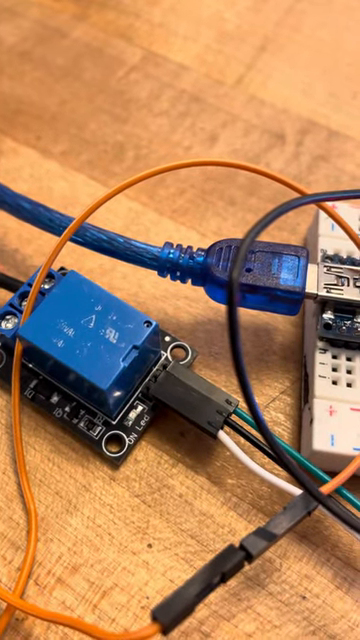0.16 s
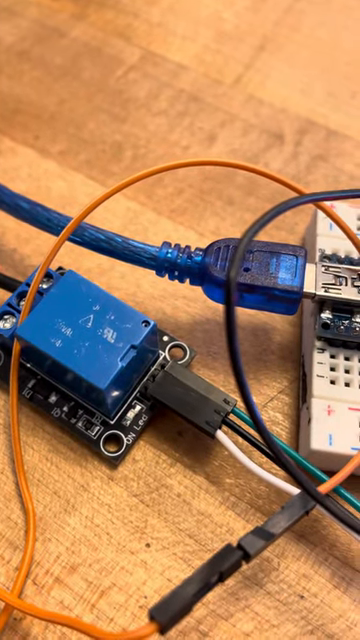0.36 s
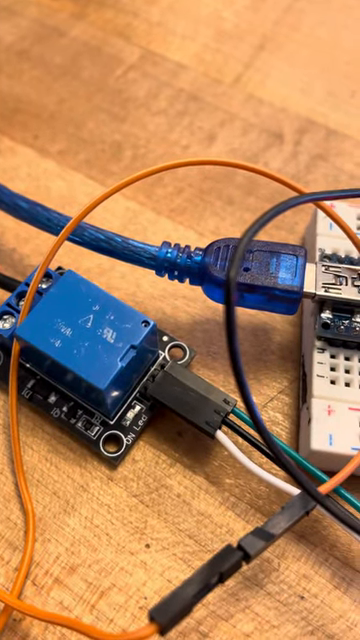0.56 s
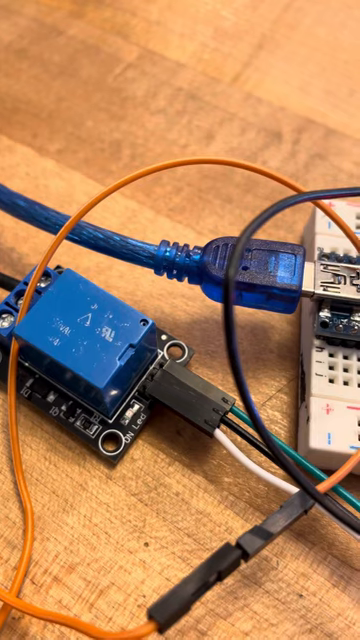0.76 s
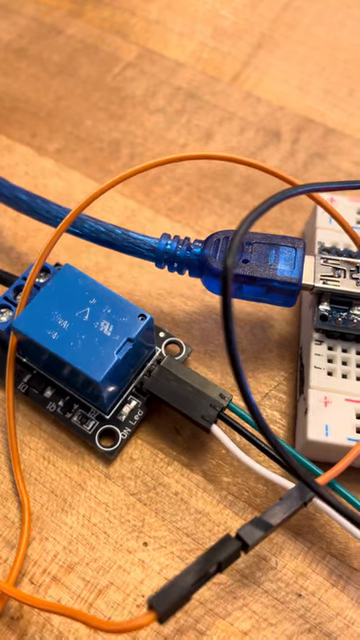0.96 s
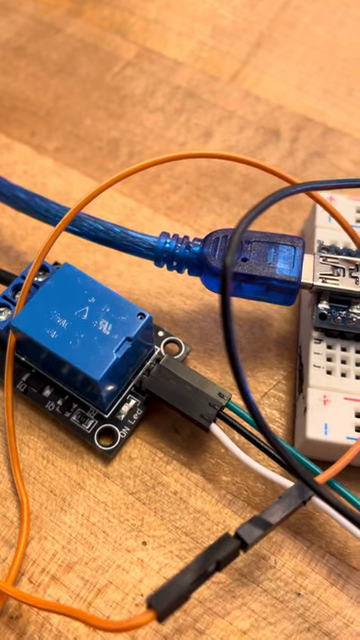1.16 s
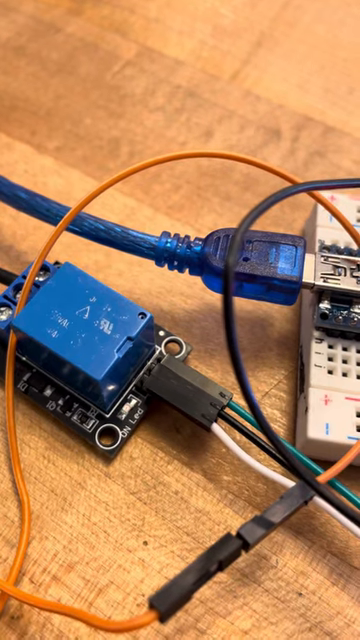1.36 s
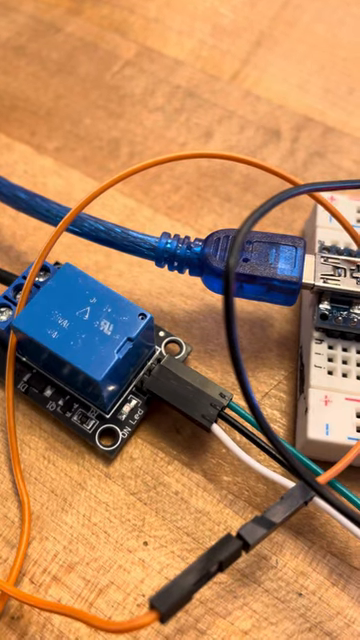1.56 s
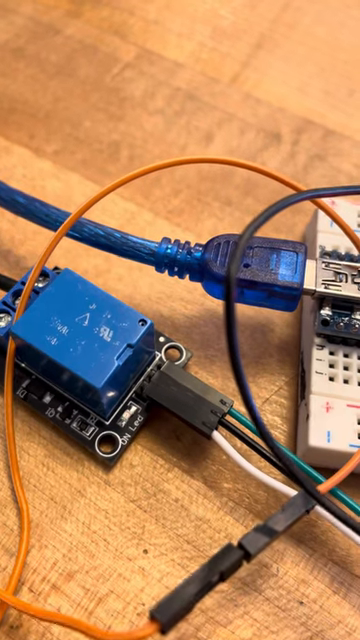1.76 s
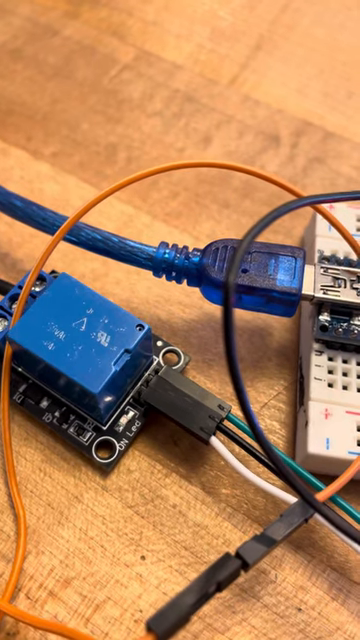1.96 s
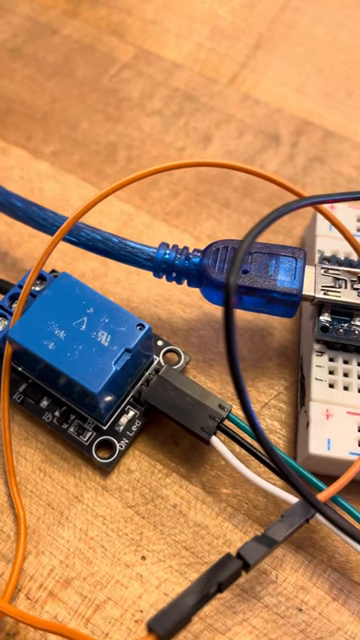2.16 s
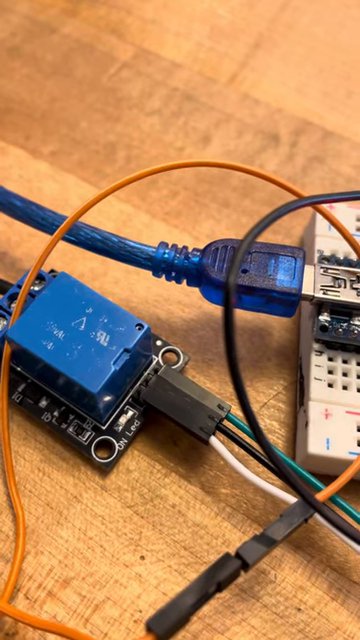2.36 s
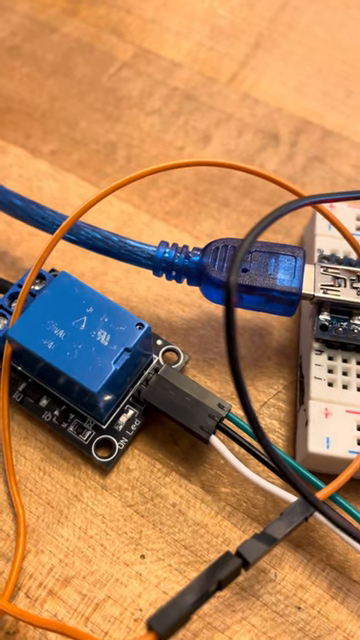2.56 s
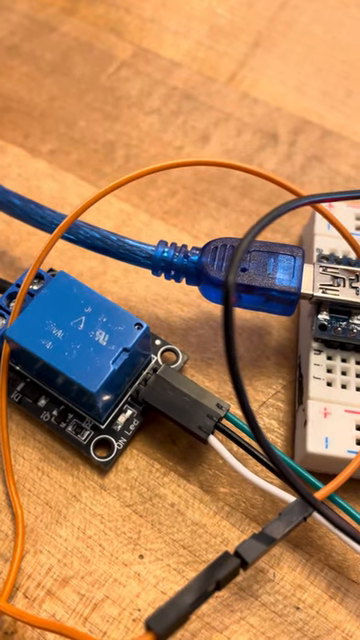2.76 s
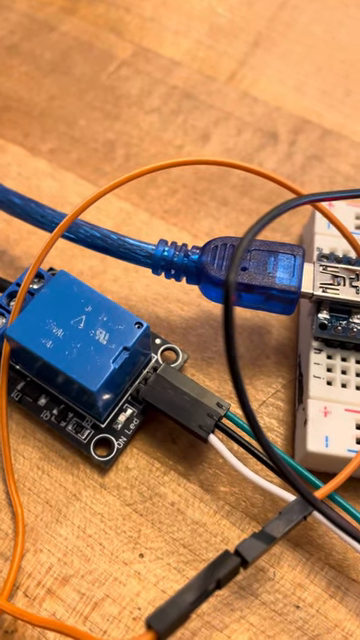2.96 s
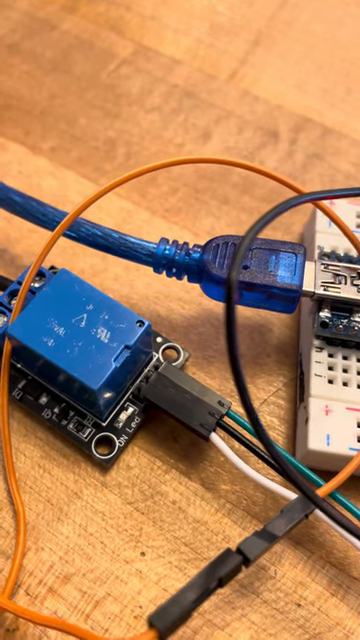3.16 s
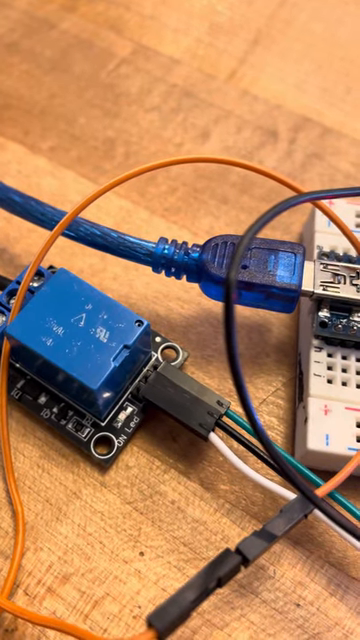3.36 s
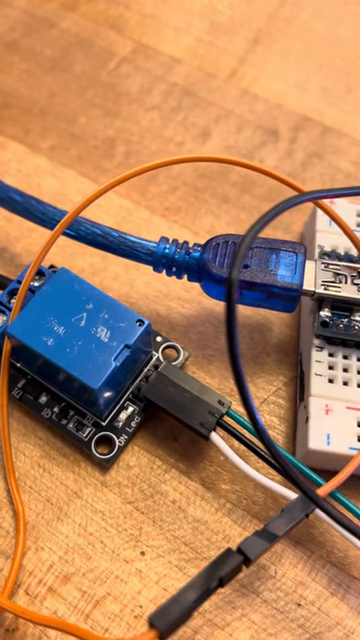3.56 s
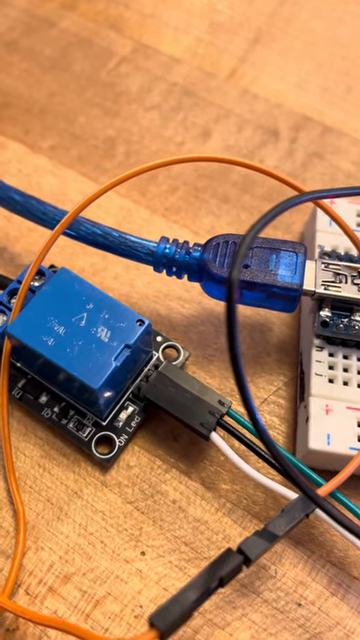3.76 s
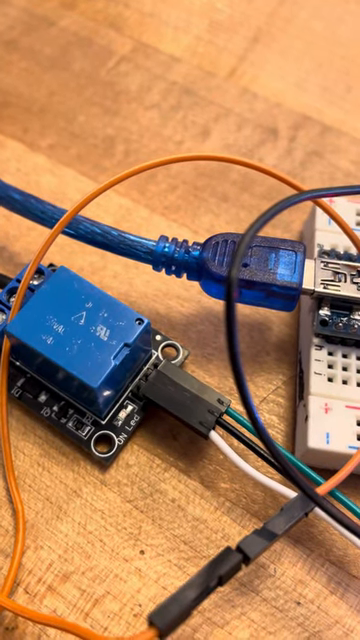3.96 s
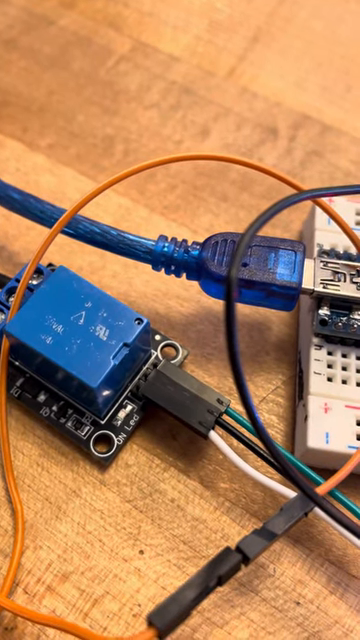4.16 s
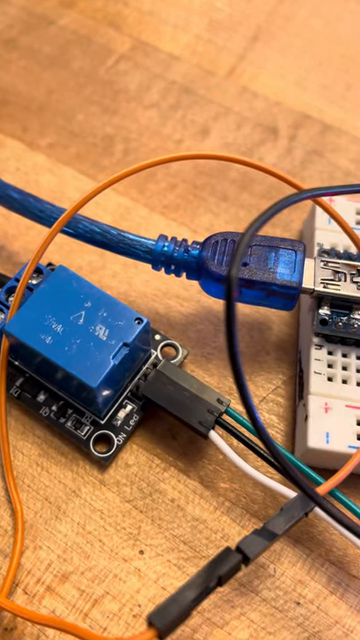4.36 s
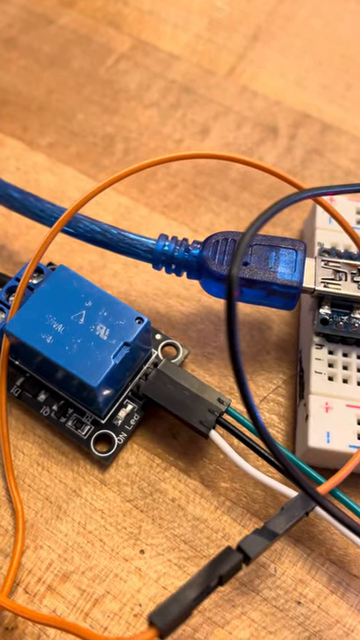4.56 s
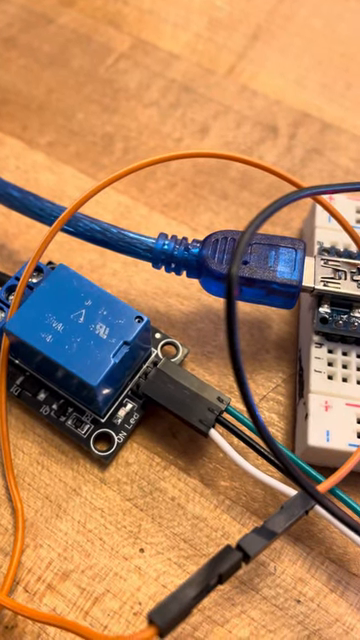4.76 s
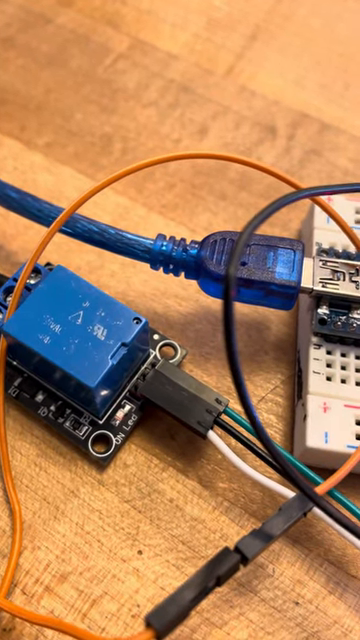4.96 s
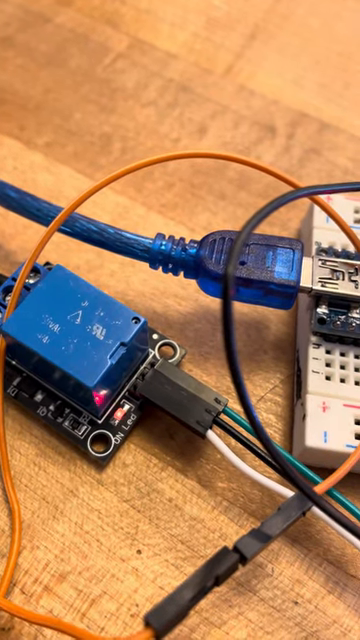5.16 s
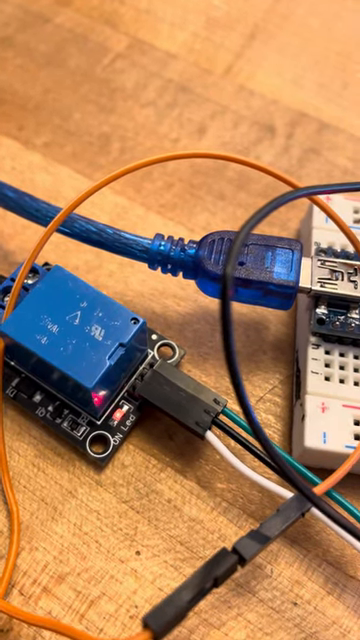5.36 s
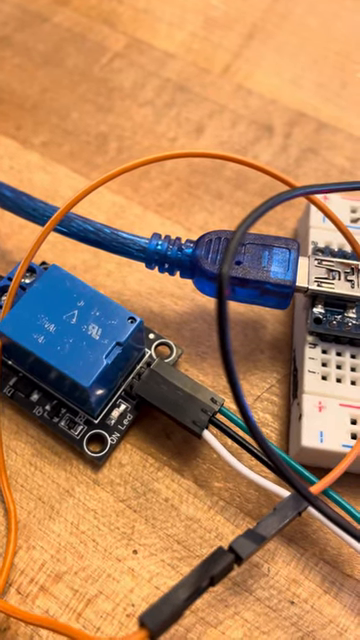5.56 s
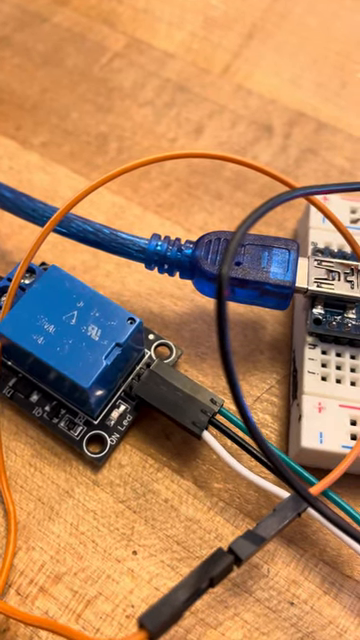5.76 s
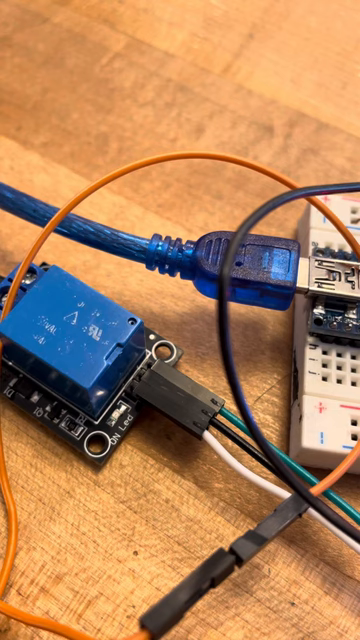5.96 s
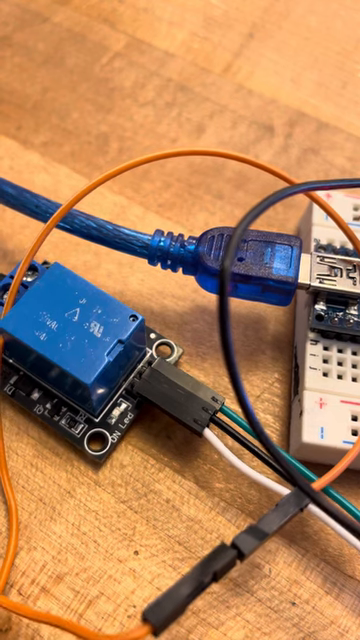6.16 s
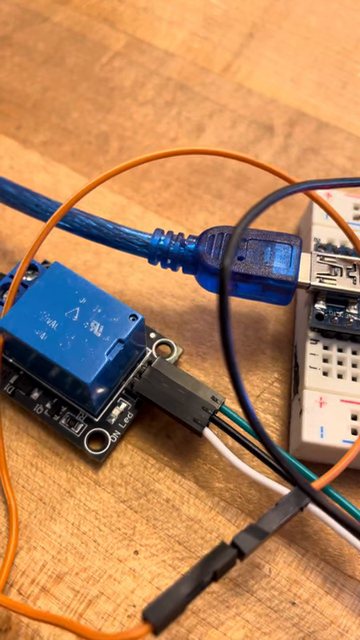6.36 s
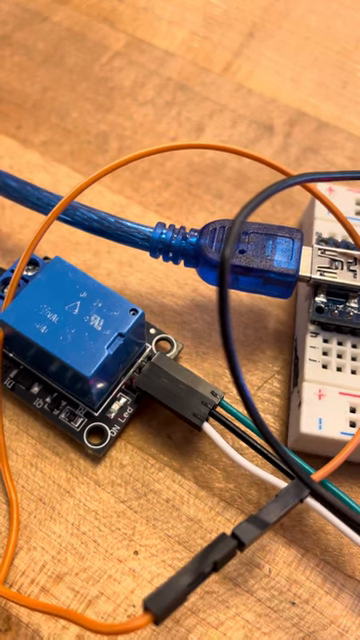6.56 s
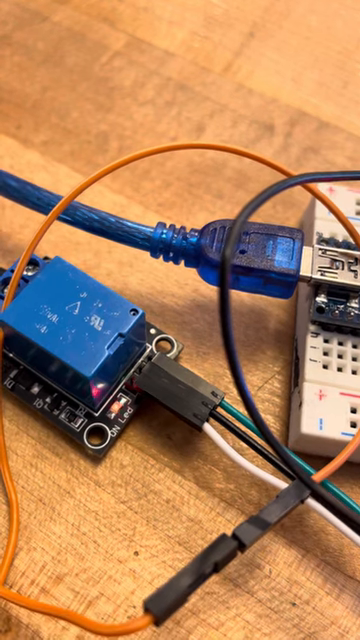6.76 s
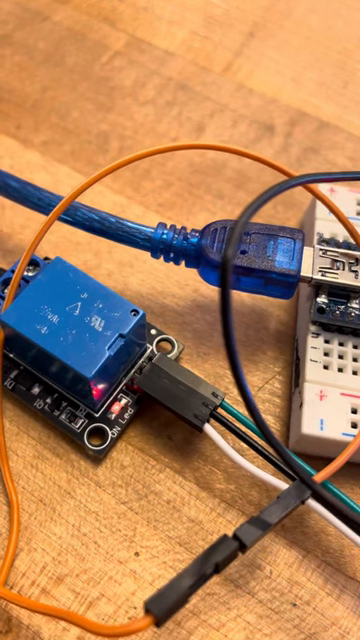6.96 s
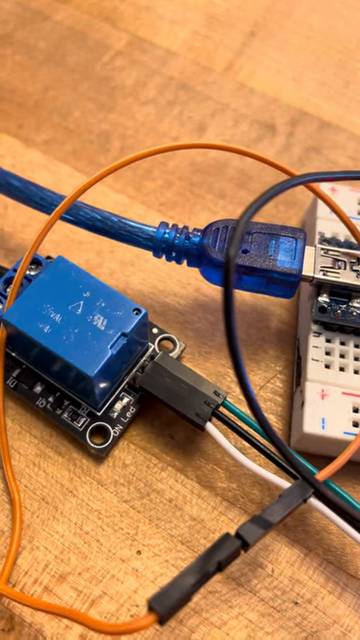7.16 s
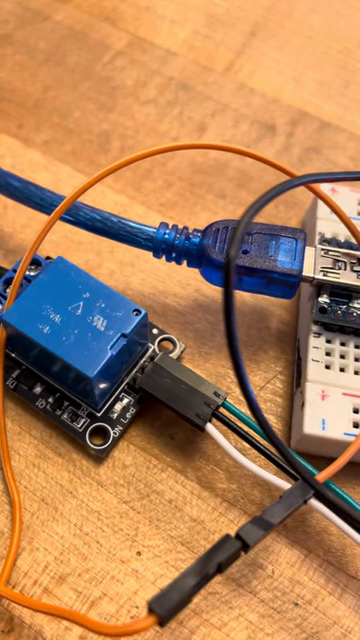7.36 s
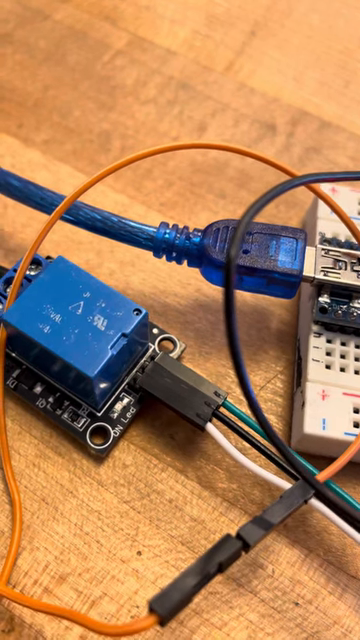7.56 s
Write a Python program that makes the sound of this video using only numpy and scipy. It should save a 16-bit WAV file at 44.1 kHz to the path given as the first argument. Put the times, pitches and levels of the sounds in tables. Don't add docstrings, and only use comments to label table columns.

```python
import sys
import numpy as np
from scipy import signal
from scipy.fft import rfft, irfft, next_fast_len
from scipy.io import wavfile

SR = 44100
rng = np.random.default_rng(int(sys.argv[2]) if len(sys.argv) > 2 else 0)


def makeup_ratio(level_db):
    decades = np.asarray(level_db, float) / 20
    return 10 ** decades


def master_out(mix):
    frames = np.transpose(np.atleast_2d(mix))
    ceiling = np.clip(frames, -1, 1)
    pcm = np.round(ceiling * 32767).astype(np.int16)
    wavfile.write(sys.argv[1], SR, pcm)


N = 335601
SPAN = 16384
CASE_LAG_S = -0.00011


def shape(x, table):
    hz, db = np.transpose(table)
    f = np.maximum(np.arange(x.shape[-1] // 2 + 1) * SR / x.shape[-1], 1)
    return irfft(rfft(x) * makeup_ratio(np.interp(np.log(f), np.log(hz), db)), x.shape[-1])


def resonate(x, hz, width_hz):
    return signal.lfilter(*signal.iirpeak(hz, hz / width_hz, fs=SR), x)


def lowpass(x, order, top_hz):
    return signal.sosfilt(signal.butter(order, top_hz, fs=SR, output="sos"), x)


def dull(x):
    return lowpass(x, 20, 12900)


def unit(x):
    return x / np.sqrt(np.mean(x ** 2))


def fade(t, t60_s):
    return np.exp(-np.log(1000) * t / t60_s)


def onset(length_s):
    return np.exp(-np.arange(SPAN) / SR / length_s)


def add(track, s, x):
    i = int(s * SR)
    track[:, i:i + x.shape[1]] += x[:, :N - i]


def turns(hz, ports=None):
    # pitch_hz, lag_turns
    side_turns = [(0, 0), (2400, 0), (3500, .93), (5300, 1.04), (6900, 1.42), (8300, 1.6), (11000, 2.0),
                  (14000, 2.4), (16500, 2.7), (22050, 4.0)]
    return np.interp(hz, *np.transpose(side_turns if ports is None else ports))


def late(x):
    f = np.arange(len(x) // 2 + 1) * SR / len(x)
    right = irfft(rfft(x) * np.exp(-2j * np.pi * turns(f)), len(x))
    return np.array([x, right])


def ring(modes, s, contact_s=.0001, ports=None, swell_s=0, span=SPAN):
    out = 0
    luck = rng.standard_normal((len(modes), 2))
    for k, (hz, db, t60_s, *lean_db) in enumerate(modes):
        lag_s = ports if np.isscalar(ports) else turns(hz, ports) / hz
        delay_s = s % (1 / SR) + np.maximum([[-lag_s], [lag_s]], 0)
        t = np.maximum(np.arange(span) / SR - delay_s, 0)
        luck_db, detune = 1.5 * luck[k, 0], 1 + .006 * luck[k, 1]
        gain = (-1) ** k * makeup_ratio(db + luck_db + sum(lean_db) * np.array([[.5], [-.5]]))
        rise_s = contact_s + swell_s * (500 / hz) ** 3
        rise = 1 - np.exp(-t / rise_s)
        out = out + gain * fade(t, t60_s) * np.sin(2 * np.pi * hz * detune * t) * rise
    return out


def air():
    # pitch_hz, level_db_per_hz
    rumble = [(20, -16), (40, -20), (70, -1.5), (100, -2.5), (260, -9), (300, -14.5), (620, -23),
              (900, -35.5), (1440, -42.5), (1900, -51.5), (2600, -55.5), (4000, -60.5), (6000, -69),
              (9000, -71.5), (12400, -77), (13300, -92)]
    # pitch_hz, width_hz, level_db
    hum = [(57, 23, -61), (85.9, 3.9, -52.5), (114.2, 28, -56.5), (137.43, 9, -55), (186.14, 11.16, -55.5),
           (224.8, 10, -65.5), (257.6, 6.8, -58.5), (642.6, 12.6, -77), (704, 25, -92), (849.4, 18.7, -82),
           (1000, 190, -93.5), (1222, 170, -87.5), (2142, 160, -93.5)]
    # pitch_hz, level_db
    port_width = [(60, -37.5), (110, -40), (200, -24.5), (380, -9.5), (700, -2.5), (1290, -0.5),
                  (2380, -3.5), (4400, 3.5), (8120, 5.5), (15000, -8)]
    # pitch_hz, level_db_per_hz
    hiss_colour = [(1500, -18.5), (3000, -2.5), (5400, -1), (7000, -4), (8400, -7.5), (9700, -4.5),
                   (12400, -9.5), (13000, -30.5), (14500, -46)]
    rumble_db, hiss_db = -50.5, -91.5
    warm = 8192
    both = []
    for noise in rng.standard_normal((2, next_fast_len(N + warm))):
        broad = makeup_ratio(rumble_db) * unit(shape(rng.standard_normal(len(noise)), rumble))
        for hz, width_hz, db in hum:
            mode = resonate(resonate(noise, hz, width_hz), hz, 2 * width_hz)
            broad = broad + makeup_ratio(db) * unit(mode)
        both.append(broad)
    mid, side = both[0], shape(both[1], port_width)
    hiss = makeup_ratio(hiss_db) * unit(shape(rng.standard_normal(len(mid)), hiss_colour))
    return (np.array([mid + side, mid - side]) + late(hiss))[:, warm:warm + N]


def room(send):
    # pitch_hz, level_db
    walls = [(300, -5), (1500, 1.5), (3200, -6), (4700, -6), (6200, -2), (7600, -9.5), (9800, -1),
             (11300, -10), (12400, -2.5), (13800, -4)]
    room_t60_s, treble_t60_s, fill_s = .38, .24, .012
    spread = .25
    clump_db, clumps_per_s, clump_s = 4, 160, .05
    t = np.arange(SPAN) / SR
    common, *own = rng.standard_normal((3, SPAN))
    spread_colour = [(1500, 1.5), (3000, 17.5), (5500, 1.0), (6800, 0), (7600, -11.5), (8500, 0)]
    dense = late(common) + spread * shape(np.array(own), spread_colour)
    low = shape(dense, [(4000, -12.0), (8000, -33.5)])
    tail = low * fade(t, room_t60_s) + (dense - low) * fade(t, treble_t60_s)
    clumps = np.interp(t, np.arange(64) / clumps_per_s, rng.standard_normal(64))
    tail = dull(tail * makeup_ratio(clump_db * clumps * np.exp(-t / clump_s)))
    tail = shape(tail * (1 - np.exp(-t / fill_s)), walls)
    return signal.fftconvolve(send[:1], tail, axes=1)[:, :N]


def ticks(near, send):
    # start_s, level_db, pitch_hz, length_s
    taps = [(2.1235, -58, 8800, 0.0017), (2.1235, -84, 12300, .003), (2.1235, -68.5, 4600, .004),
            (2.3252, -62, 11800, .002), (2.3252, -70, 8960, .002), (2.3252, -71, 6000, .002),
            (2.333, -78, 11500, .0014), (2.333, -71, 7000, .0014), (2.279, -76.5, 4700, 0.018),
            (2.281, -83.5, 11500, .018), (4.363, -72, 2200, .006), (2.1064, -72.5, 4440, 0.0048),
            (2.117, -75.5, 4700, 0.0045), (2.194, -75.5, 4240, .0013), (3.262, -88, 9930, 0.0021),
            (5.4357, -59.5, 10700, 0.00054), (5.713, -73.5, 6500, 0.03), (5.714, -71.5, 11500, 0.00605),
            (5.83, -90, 10940, 0.0018), (5.887, -80, 10040, 0.0011), (7.062, -81, 4800, 0.004),
            (7.167, -74, 5900, 0.014), (7.167, -81, 11200, .014), (7.179, -76, 5400, .004)]
    # start_s, level_db, pitch_hz, length_s
    rustles = [
        (.86, -87, 7000, 0.0022),
        (2.112, -83, 7000, 0.0091),
        (2.321, -83, 5000, .002),
        (4.362, -73, 6660, 0.00426),
        (6.848, -82, 3120, 0.0027),
        (7.1785, -76, 8030, 0.003),
    ]
    usual_db, quiet_db, room_fall_per_db = -73, -8, 1.5
    t = np.arange(SPAN // 4) / SR
    # rows, width over pitch, room_db
    for rows, width, room_db in ((taps, .42, -40), (rustles, 1.2, -38.5)):
        for s, db, hz, length_s in rows:
            swell = (t / length_s) * np.exp(1 - 3 * t / length_s) * 3
            burst = lowpass(rng.standard_normal(len(t)) * swell, 4, 13500)
            scrape = resonate(resonate(burst, hz, width * hz), hz, 1.7 * width * hz)
            tick = makeup_ratio(db + 15.0) * late(scrape)
            add(near, s, tick)
            wet_db = room_db - room_fall_per_db * max(db - usual_db, quiet_db)
            add(send, s, makeup_ratio(wet_db) * tick)


def keys(near, send):
    # start_s, knock_db, thump_db, clip_db
    hits = [
        (1.7696, -48.5, -51, -75),
        (1.7796, -59, -47.5, -48),
    ]
    # mode_hz, level_db, t60_s, left_minus_right_db
    cap = [(1530, -6.5, 0.011, 1), (1900, -5.5, 0.021, -3.5), (2400, -8.5, 0.019, -9),
           (3700, -1, 0.0044, -6), (4150, 0.5, .004, 0), (4900, 5.5, .004, -3), (5480, 0.5, .003, -3.5),
           (6200, 0, .003, -3.5), (6890, 1, .003, -2.5), (7600, 0.5, .003, -5.5), (8500, -2.5, .002, 0.5)]
    # mode_hz, level_db, t60_s, left_minus_right_db
    tray = [(349, 1.5, .09, -1), (460, 4, 0.063, -1.5), (570, -6, .07, 0), (670, -10.5, 0.14, -6),
            (780, -6, 0.064, -4), (910, -11, .04, -3), (1010, -7.5, 0.035, -6), (1180, -13.5, .03, -2)]
    # mode_hz, level_db, t60_s, left_minus_right_db
    clip = [(4433, 3, .011, -3), (3890, -4, .005, 0)]
    room_db = -26.5
    for s, knock_db, thump_db, clip_db in hits:
        knock = makeup_ratio(knock_db) * ring(cap, s, .0002)
        thump = makeup_ratio(thump_db) * ring(tray, s, .0005, ports=CASE_LAG_S, swell_s=.0006)
        hit = knock + thump
        add(near, s, hit + makeup_ratio(clip_db) * ring(clip, s, 0.000397))
        add(send, s, makeup_ratio(room_db) * hit * onset(0.0057))


def snap(near, send, s, db, shell, rattle_db, room_db, pitch_s):
    echo_s, echo_db, echo_smear_s = 0.0075, -10.5, .002
    t = np.arange(SPAN) / SR
    click = ring(shell, s)
    knocks = rng.standard_normal(SPAN) * makeup_ratio(5 * rng.standard_normal(SPAN))
    knocks = knocks * np.exp(-t / 0.0028 - (t / 0.0037) ** 2) * np.minimum(t / 0.00074, 1)
    rattle = signal.fftconvolve(click[:, :512], knocks[None] / np.linalg.norm(knocks))[:, :SPAN]
    add(near, s, makeup_ratio(db - 1.0) * (click + makeup_ratio(rattle_db) * rattle))
    smear = rng.standard_normal(512) * np.exp(-t[:512] / echo_smear_s)
    echo = signal.fftconvolve(click[:, :512], smear[None] / np.linalg.norm(smear))
    add(near, s + echo_s, makeup_ratio(db - 2 + echo_db) * dull(echo))
    add(send, s, makeup_ratio(db - 2 + room_db) * click * np.exp(-t / pitch_s))


def leaf_spring(near):
    # start_s, level_db, pitch_hz, t60_s, stop_s
    leaf = [
        (1.704, -76, 15500, .5, 1.783),
    ]
    (s, db, hz, t60_s, stop_s), = leaf
    t = np.arange(SPAN) / SR
    whistle = unit(resonate(resonate(rng.standard_normal(SPAN), hz, 350), hz, 500))
    whistle = whistle * np.clip((stop_s - s - t) / .006, 0, 1)
    add(near, s, makeup_ratio(db) * late(whistle * fade(t, t60_s)))


def switches(near, send):
    # start_s, snap_db, hollow_db, room_db
    press = [
        (1.7022, -23.5, -46, -26.5),
        (2.3595, -26.5, -45.5, -28.5),
    ]
    # start_s, snap_db, hollow_db, room_db
    release = [
        (1.6394, -28, -48.5, -23.5),
        (1.7800, -26.5, -66.5, -25),
        (4.0364, -26.5, -61, -25),
    ]
    # start_s, level_db
    held_knocks = [(1.7016, -39), (1.7019, -36), (1.7036, -36), (1.7043, -34), (1.7049, -37),
                   (1.7058, -38.5), (1.7074, -38), (2.3588, -39.5), (2.3588, -25.5), (2.3606, -36.5),
                   (2.3618, -36.5), (2.3627, -37.5), (2.3641, -38), (2.3646, -38)]
    # start_s, level_db
    free_knocks = [(1.6361, -39), (1.6366, -41.5), (1.6373, -42), (1.6405, -39), (1.6412, -41),
                   (1.7790, -41.5), (1.7807, -37), (1.7817, -38), (1.7827, -37), (1.7846, -49),
                   (4.0348, -43.5), (4.0376, -41), (4.0391, -41.5)]
    # mode_hz, level_db, t60_s
    shell_held = [(3694, -23.5, 0.007), (4400, -20, 0.0057), (5450, -9.5, 0.0047), (7300, -9, .003),
                  (8400, -2.5, .003), (9600, 0, 0.0037), (11130, -3.5, 0.0025), (12650, -8, .003),
                  (14200, -11, .003), (15300, -15, .003)]
    # mode_hz, level_db, t60_s
    shell_free = [(4384, -21, 0.0033), (5585, -9.5, 0.0029), (6700, -2, 0.003), (7860, 3, .003),
                  (8900, 0.5, 0.0038), (9690, -0.5, 0.0033), (10715, 0, 0.0028), (12680, -6.5, 0.0017),
                  (13750, -6, .002), (15200, -11.5, 0.001966)]
    # mode_hz, level_db, t60_s, left_minus_right_db
    hollow_held = [(410, -4.5, .12, -2), (698, 0, .065, -4.5), (843, -1, .24, -6.5),
                   (1170, -7.5, 0.06, -3.5), (1490, -9, 0.041, -1), (1760, -10.5, 0.056, -1.5),
                   (2023, -13, 0.05, -4.5), (2270, -13.5, .03, -1.5), (2590, -15.5, 0.018, 0),
                   (3050, -16.5, .015, 0.5)]
    # mode_hz, level_db, t60_s, left_minus_right_db
    hollow_free = [(738, 0.5, .09, -7), (1006, -5, .04, -3.5), (1810, -7, 0.018, -2.5), (2200, -7, .02, -5)]
    hollow_room_db, knock_room_db = -23.5, -34.0
    # rattle_db, pitch_s
    for snaps, knocks, shell, hollow, rattle_db, pitch_s in (
            (press, held_knocks, shell_held, hollow_held, -6, .0012),
            (release, free_knocks, shell_free, hollow_free, -15.5, .0007)):
        for s, db, hollow_db, room_db in snaps:
            snap(near, send, s, db, shell, rattle_db, room_db, pitch_s)
            body = ring(hollow, s, contact_s=.0015, ports=CASE_LAG_S, swell_s=0.011)
            body = makeup_ratio(hollow_db) * body
            add(near, s, body)
            add(send, s, makeup_ratio(hollow_room_db) * body * onset(.004))
        for s, db in knocks:
            knock = makeup_ratio(db) * ring(shell, s, span=1024)
            add(near, s, knock)
            add(send, s, makeup_ratio(knock_room_db) * knock)
    leaf_spring(near)


def relay(near, send):
    # start_s, blow_db, crack_db, tick_db
    pull_in = [
        (5.151, -47.5, -42.5, -48),
        (6.7802, -49.5, -44.5, -50.5),
    ]
    # start_s, blow_db, crack_db, tick_db
    drop_out = [
        (5.4516, -45.5, -30, -37),
        (7.0721, -46, -25.5, -31.5),
    ]
    # mode_hz, level_db, t60_s, left_minus_right_db
    case = [(323, 0.5, 0.082, -3), (410, -3, 0.12, 3), (516, -3.5, 0.16, -4.5), (582, -14, 0.11, -2),
            (695, -4.5, 0.19, -11), (765, 1, 0.045, -0.5), (857, -7.5, 0.1, 2), (994, 5.5, 0.04, -5),
            (1070, -4.5, 0.019, 1.5), (1250, -16.5, 0.024, 4), (1524, -16.5, 0.034, -1),
            (2050, -16.5, 0.059, -10), (2200, -14, 0.02, 2.5), (2430, -14, 0.028, -11),
            (2650, -9, 0.004, -19.5)]
    # mode_hz, level_db, t60_s, left_minus_right_db
    pull_shell = [(1510, -10.5, 0.0036, -2), (2220, 1, 0.0043, 0), (2724, -16, 0.003, -9),
                  (3300, -7, .003, -10), (3720, -4.5, 0.004, -6), (4180, 5, 0.0042, -5),
                  (5400, -5, 0.0039, -9), (5900, -0.5, 0.0034, -1), (3430, -25, 0.059, 1),
                  (3950, -21, 0.051, -1), (3050, -30, .03, -3)]
    # mode_hz, level_db, t60_s, left_minus_right_db
    drop_shell = [(1390, -17, 0.0055, 2), (1940, -6.5, 0.0022, -2), (2660, -2, 0.0036, -13.5),
                  (3230, 2, 0.0015, -12), (3830, 3, 0.0042, -4), (4200, 5, 0.0035, 7.5),
                  (4800, 5, 0.0036, -9.5), (5360, 7, 0.0036, -1.5), (6000, 6.5, 0.0023, -5.5),
                  (6790, -1.5, 0.0032, -8.5), (7730, -6, 0.0023, 10), (3320, -27.5, 0.072, 8),
                  (4020, -27, 0.06, -4), (4700, -36, 0.058, 6)]
    # mode_hz, level_db, t60_s
    spring = [(8600, 2.5, 0.0013), (10170, 7.93, 0.0016), (11870, 5.14, 0.0015), (13300, -10, .0022),
              (15000, -15.5, .003)]
    # pitch_hz, lag_turns
    pull_turns = [(0, 0), (3000, .07), (4000, .23), (5000, 0), (6500, .05)]
    # pitch_hz, lag_turns
    drop_turns = [(0, 0), (2000, -.07), (2500, -.42), (3000, -.5), (3500, -.7), (4400, -.8), (4700, .86),
                  (5500, 1.07), (6500, 1.3), (8000, 1.55)]
    room_db, spring_room_db = -18.5, -41
    # wet_db, touch_s, bounce_s, bounce_db
    for moves, shell, lag, wet_db, touch_s, bounce_s, bounce_db in (
            (pull_in, pull_shell, pull_turns, 2, .0011, .00076, 7.5),
            (drop_out, drop_shell, drop_turns, -6, .0002, .00093, 2.5)):
        for s, blow_db, crack_db, tick_db in moves:
            thump = ring(case, s, contact_s=0.00012, ports=CASE_LAG_S, swell_s=0.0017)
            thump = makeup_ratio(blow_db) * thump
            add(near, s, thump)
            add(send, s, makeup_ratio(room_db - 7.5) * thump * onset(0.0047))
            for at, db in ((s, -4), (s + bounce_s, bounce_db - 31.0)):
                crack = makeup_ratio(crack_db) * ring(shell, at, touch_s, ports=lag)
                tick = makeup_ratio(tick_db) * ring(spring, at)
                add(near, at, makeup_ratio(db) * (crack + tick))
                shaded = crack + makeup_ratio(spring_room_db) * tick
                add(send, at, makeup_ratio(db + room_db + wet_db) * shaded * onset(0.00024))


def scene():
    near, send = np.zeros((2, N)), np.zeros((2, N))
    ticks(near, send)
    keys(near, send)
    switches(near, send)
    relay(near, send)
    return air() + room(send) + near


def roll_off(x):
    return signal.sosfilt(signal.butter(12, 16510, fs=SR, output="sos"), x)


def record(dry):
    heard = lowpass(dry, 8, 16000)
    return roll_off(heard)


dry = scene()
out = record(dry)
master_out(out)
```